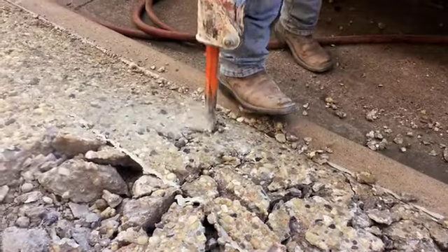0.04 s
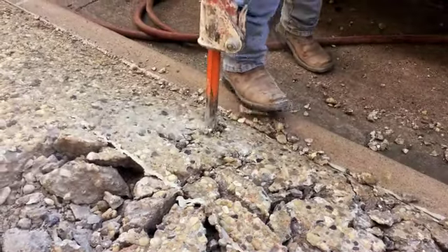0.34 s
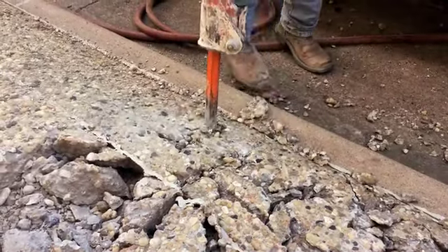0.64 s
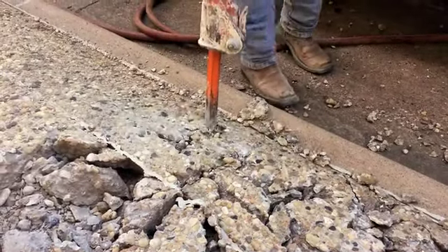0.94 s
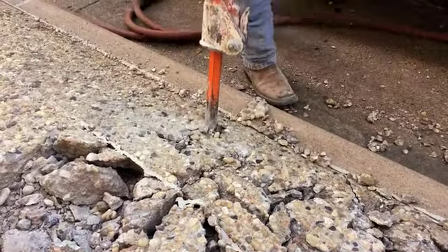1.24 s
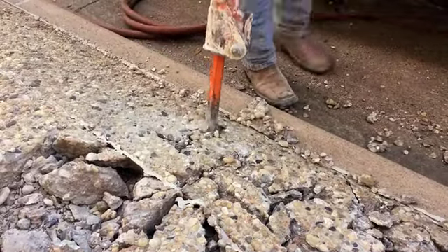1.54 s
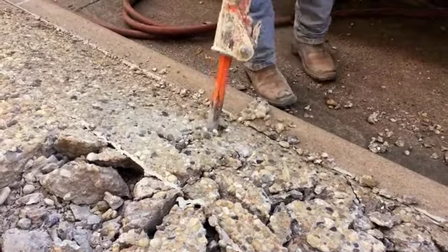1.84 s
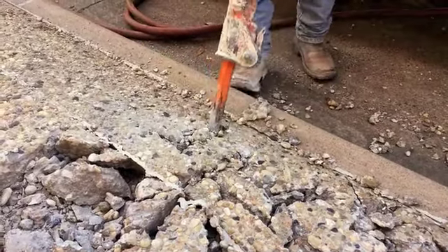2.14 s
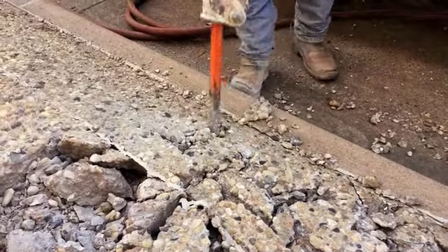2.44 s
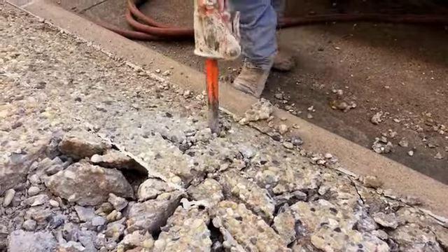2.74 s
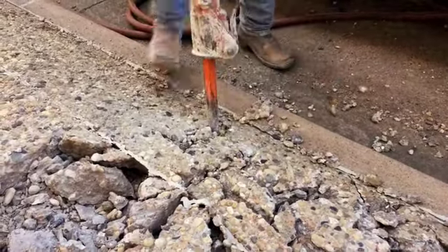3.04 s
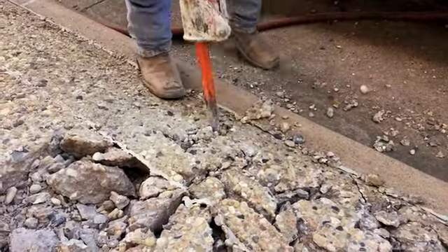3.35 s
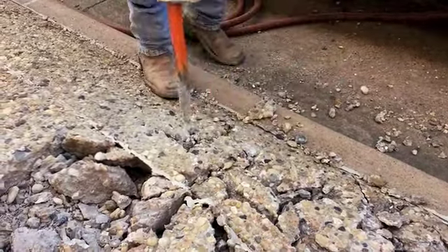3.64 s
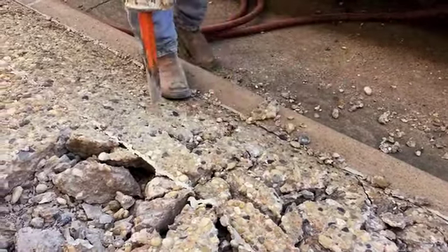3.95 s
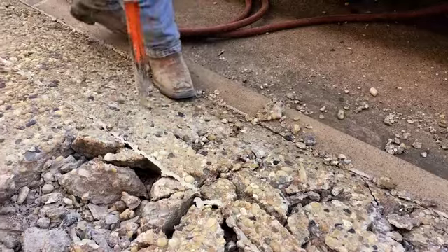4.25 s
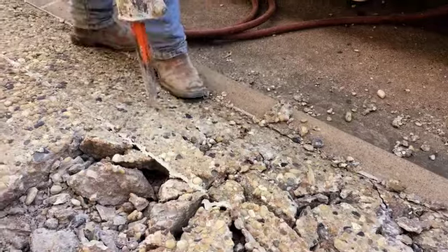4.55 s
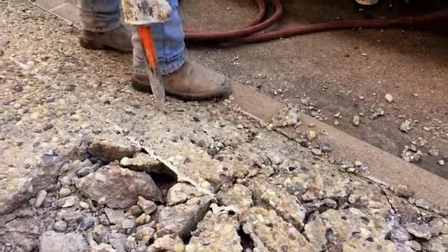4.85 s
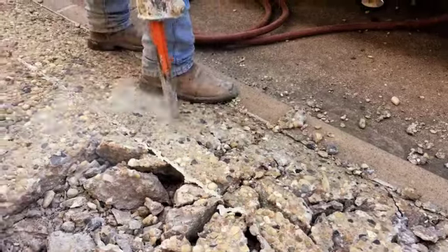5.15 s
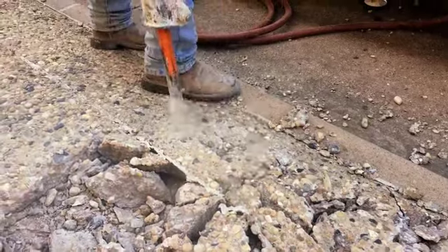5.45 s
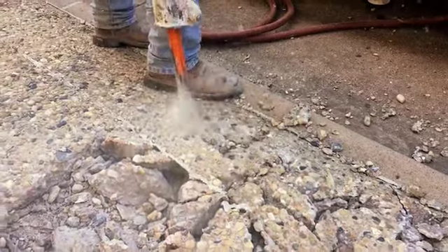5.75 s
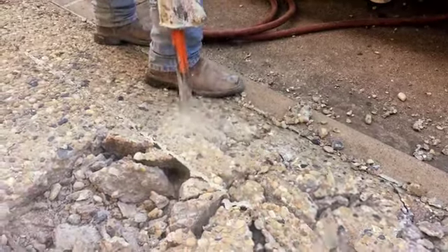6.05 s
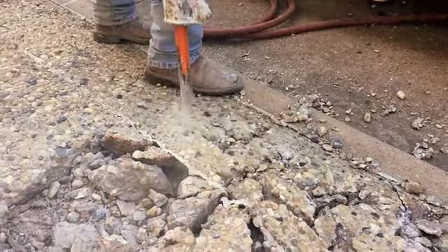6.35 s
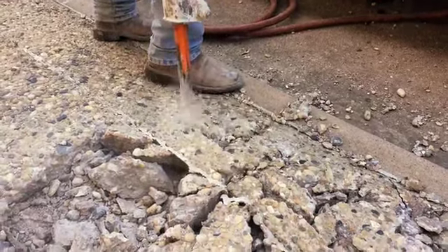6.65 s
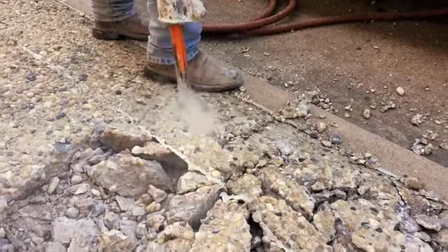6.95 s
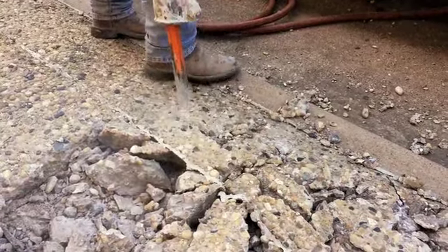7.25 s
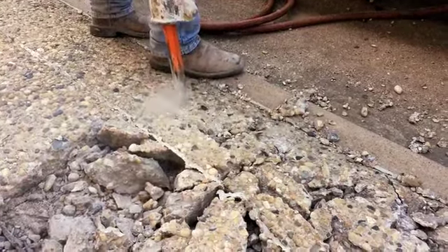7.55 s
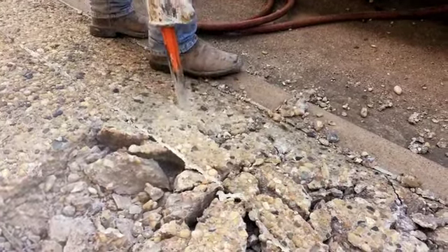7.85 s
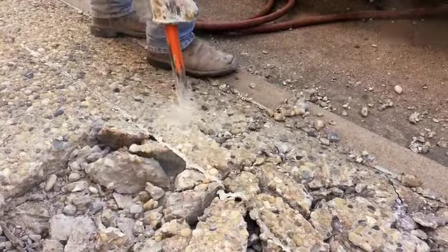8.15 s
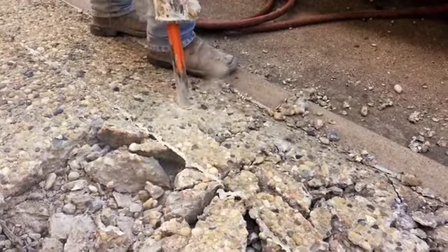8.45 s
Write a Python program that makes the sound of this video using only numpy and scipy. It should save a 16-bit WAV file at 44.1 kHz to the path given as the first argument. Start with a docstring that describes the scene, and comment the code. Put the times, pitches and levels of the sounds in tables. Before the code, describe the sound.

A jackhammer rattles on concrete, pauses while its chisel clinks and scrapes over a humming compressor, then resumes hammering loudly.

```python
"""Jackhammer on concrete

A pneumatic piston's blows and return strokes excite the modes of housing, chisel and slab, and each
vents a puff of air. In a pause the compressor engine sinks to idle, pebbles snap underfoot, and the
chisel clinks, is dragged to a new spot and thuds down on the slab; then the hammering resumes. Air
buffets the microphone. A gain control ducks at loud sounds and lets the compressor swell in the pause."""
import sys
import numpy as np
from scipy import signal
from scipy.fft import rfft, irfft
from scipy.io import wavfile
from scipy.ndimage import uniform_filter1d

SR = 44100
rng = np.random.default_rng(int(sys.argv[2]) if len(sys.argv) > 2 else 0)


def wav_out(sig):
    """Save sig, one row per channel (or a flat mono array), as 16-bit PCM at SR to the path in sys.argv[1]."""
    wavfile.write(sys.argv[1], SR, np.round(np.clip(np.atleast_2d(sig).T, -1, 1) * 32767).astype(np.int16))


N = 384111
T = np.arange(N) / SR

# the piston's pace, one list per burst: time_s, blows_so_far
BURSTS = [
    [(-.033, 0), (.404, 9)],
    [(3.546, 0), (3.892, 7), (4.403, 17), (4.757, 24), (4.913, 27), (5.527, 39), (5.772, 44), (6.269, 54),
     (6.81, 65), (7.732, 84), (8.741, 105)],
]
# how the tool sits as it digs in: time_s, chisel_looseness (0-1), port_pitch_hz
SEATING = [(0, 0.12, 1570), (.45, 0.14, 1700), (3.5, 0.79, 1980), (4.2, 0.96, 1980), (5.498, 0.83, 2022),
           (6.349, 0.57, 2053), (6.797, 0.26, 2028), (7.3, 0.1, 2074), (7.8, 0.09, 2037), (8.7, 0.12, 2150)]
# the chisel's modes: pitch_hz, width_hz, struck_end_on_db, knocked_sideways_db
CHISEL_MODES = [(1585, 20, -5.5, -3), (2760, 150, -26, 1.5), (3090, 33, 5, 13.5), (3560, 90, -13, 5),
                (4810, 84, -29, -4), (5190, 23, -4, -10), (6810, 38, -11.5, -7), (9200, 28, -16.5, -13.5),
                (11500, 37, -25, -34), (13160, 70, -35, -35), (14200, 60, -35, -33),
                (15400, 27, -21.5, -42)]


def jackhammer():
    """Impact excitation: each stroke drives several resonators; a loose chisel rings far more."""
    blows, returns = strokes()
    loose = along(SEATING)[0]
    body = housing(blows, returns) + amp(-9.5) * port(blows, returns)
    body += amp(-7.5) * muffler(blows, returns)
    steel = amp(-3 - 2.5 * loose) * clash(blows, returns)
    crushed = amp(-17.5) * grit(blows, returns)
    body += slab_boom(blows, returns)
    steel += blow_clangs(blows, returns)
    steel += amp(-19 + 18.5 * loose) * free_ring(blows, returns)
    return amp(5.5 - 0.5 * loose) * body + steel + crushed


def strokes(return_s=0.019):
    """Reciprocation: times of blows and return strokes, the returns later when the chisel is loose."""
    blows = np.concatenate([np.interp(np.arange(b[-1][1]), *np.transpose(b)[::-1]) for b in BURSTS])
    loose = along(SEATING, blows)[0]
    blows += 0.00017 * loose * rng.standard_normal(len(blows))
    lag_s = loose * (0.0033 + 0.0008 * rng.standard_normal(len(blows)))
    return blows, blows + return_s + lag_s


def impacts(blows, returns, return_db, alike, contact_s, tail_db, tail_s, scatter_db, rattle_db):
    """Quasi-periodic forcing: part of each impact repeats every cycle, drifting as the chisel digs in."""
    out = np.zeros(N)
    for times, db in ((blows, 0), (returns, return_db)):
        patterns = [chatter(contact_s, tail_db, tail_s) for _ in range(14)]
        for s, loose in zip(times, along(SEATING, times)[0]):
            k, blend = divmod(np.clip(s / T[-1], 0, 1) * (len(patterns) - 2), 0.94)
            angle = blend * np.pi / 2
            repeated = np.cos(angle) * patterns[int(k)] + np.sin(angle) * patterns[int(k) + 1]
            share = alike * (1 - 0.25 * loose)
            gain = amp(db + scatter_db * np.clip(rng.standard_normal(), -2, 2))
            fresh = chatter(contact_s, tail_db, tail_s)
            add(out, s, gain * (np.sqrt(share) * repeated + np.sqrt(1 - share) * fresh))
            # a loose chisel rattles in its collar just ahead of the stroke
            early_s = s - rng.uniform(0.001, 0.005)
            add(out, early_s, gain * loose * amp(rattle_db) * chatter(contact_s, tail_db, tail_s))
    return out


def housing(blows, returns):
    """Forced vibration: the housing's resonances filter the piston's knocks."""
    # the housing's response: frequency_hz, gain_db
    response = [(120, -10.5), (200, -13.5), (244, -11.5), (287, -3), (405, -10), (455, -2), (560, -5.5),
                (830, -8.5), (1130, -11), (1360, -8.5), (1880, -11.5), (2060, -3), (2700, -9.5),
                (3290, -0.5), (4470, -18.5), (5360, -18.5), (15000, -49)]
    knocks = impacts(blows, returns, return_db=-2, alike=0.82, contact_s=0.009,
                     tail_db=-10.3, tail_s=0.026, scatter_db=0.8, rattle_db=0)
    return unit(colour(knocks, response))


def port(blows, returns):
    """Air resonance: vented bursts excite the exhaust port's modes, which shift together."""
    # the port's modes: pitch_ratio, width_hz, level_db
    modes = [(.48, 54.3, -4), (.69, 70, -9), (1, 57, 2), (1.1, 45.7, -4)]
    port_hz = along(SEATING)[1]
    air = impacts(blows, returns, return_db=-1, alike=0.9, contact_s=0.007,
                  tail_db=-16, tail_s=0.015, scatter_db=0.8, rattle_db=-6)
    return unit(sum((-1) ** k * amp(db) * resonate(air, port_hz * ratio, width)
                    for k, (ratio, width, db) in enumerate(modes)))


def muffler(blows, returns, delay_s=0.00376):
    """Cavity resonance: each stroke vents one sharp puff through the muffler."""
    # the muffler's resonances: pitch_hz, width_hz, level_db
    modes = [(86, 17, 1.5), (105, 93, -2), (127, 59, -15), (188, 23.2, 6.5), (281, 26, -6.5),
             (454, 64, 3.5)]
    puffs = np.zeros(N)
    for times, db in ((blows, 0), (returns, -3)):
        for s in times:
            vent_s = s + delay_s + 0.00035 * rng.standard_normal()
            add(puffs, vent_s, amp(db + 1.54 * rng.standard_normal(1)))
    return unit(colour(ring(puffs, modes), [(20, -11), (55, -8.5), (78, 4.5), (700, -2), (2000, -27)]))


def clash(blows, returns):
    """Hard contact: steel meets steel, radiating a band of noise around the chisel's main mode."""
    strikes = impacts(blows, returns, return_db=-2.5, alike=0.28, contact_s=0.008,
                      tail_db=-12, tail_s=0.01, scatter_db=2, rattle_db=-6)
    band = [(1500, -36.5), (2700, -14.5), (3100, 1.5), (3450, -5), (3800, -8), (4500, -23), (8000, -43)]
    return unit(colour(strikes, band))


def blow_clangs(blows, returns, pitch_hz=3340, level_db=8, contact_s=0.0074):
    """Driven mode: each stroke sounds the chisel's main mode, the return more weakly and roughly."""
    # blows that clang out above the rest: time_s, pitch_hz, level_db
    hard_blows = [(3.595, 3186, 14), (4.148, 3280, 17.5), (4.301, 3290, 12.5), (4.403, 3100, 10.5),
                  (5.374, 3050, 10.5), (5.921, 3330, 12), (6.12, 3350, 13.5), (6.613, 3310, 14),
                  (6.859, 3330, 8), (7.053, 3340, 12), (7.101, 3370, 6), (7.392, 3260, 10.5),
                  (7.78, 3330, 10), (7.924, 3370, 12), (7.972, 3396, 13)]
    accents = {np.argmin(abs(blows - s)): (hz, db) for s, hz, db in hard_blows}
    out = np.zeros(N)
    for k, loose in enumerate(along(SEATING, blows)[0]):
        detune, force = np.clip(rng.standard_normal(2), -2, 2)
        hz, db = accents.get(k, (pitch_hz * (1 + 0.011 * detune), level_db + 0.5 * force))
        add(out, blows[k], amp(db) * squeal(hz, contact_s + 0.0076 * loose, rough=0.69))
        return_hz = pitch_hz * rng.uniform(0.93, 1.04)
        add(out, returns[k], amp(level_db - 4) * squeal(return_hz, contact_s, rough=1.09))
    return out


def free_ring(blows, returns, scatter_db=5, detune=0.0091):
    """Free vibration: each stroke shares its energy anew among the chisel's modes and detunes them."""
    out, t = np.zeros(N), np.arange(4400) / SR
    for hz, width, db, _ in CHISEL_MODES:
        envelope = amp(db) * width * (1 - np.exp(-t / 0.0012)) * np.exp(-np.pi * width * t)
        for times, stroke_db in ((blows, 0), (returns, -4)):
            for s, (share, shift) in zip(times, np.clip(rng.standard_normal((len(times), 2)), -2, 1.5)):
                tone = np.sin(2 * np.pi * hz * (1 + detune * shift) * t)
                add(out, s + 0.002022, amp(stroke_db + scatter_db * share) * envelope * tone)
    return unit(out)


def slab_boom(blows, returns):
    """Plate resonance: the slab booms at each blow, its pitch less even when the chisel is loose."""
    # the boom shifts as cracks open under the tip: time_s, pitch_hz, level_db
    resonance = [(.2, 650, -11.5), (3.55, 790, -15), (5.5, 784, -15.5), (5.9, 544, -12), (6.1, 560, -3),
                 (6.24, 770, -9), (6.6, 624, -7), (6.93, 656, -5), (7.13, 525, -12), (7.75, 515, -14.5),
                 (8.4, 635, -19), (8.52, 520, -21)]
    push = impacts(blows, returns, return_db=-5, alike=0.92, contact_s=0.007,
                   tail_db=-20, tail_s=0.01, scatter_db=1, rattle_db=-9)
    hz, db = along(resonance, blows)
    hz *= np.exp(0.097 * along(SEATING, blows)[0] * rng.standard_normal(len(blows)))
    return amp(np.interp(T, blows, db)) * unit(resonate(push, np.interp(T, blows, hz), width_hz=125))


def grit(blows, returns):
    """Brittle fracture: stone crushed at each stroke gives a flickering hiss."""
    # spectrum of crushing stone: frequency_hz, gain_db
    spectrum = [(1500, -36), (4000, -6), (6000, 20), (9500, 19), (12000, 11.5), (16000, -60)]
    crush = impacts(blows, returns, return_db=-3.5, alike=0, contact_s=0.004,
                    tail_db=0, tail_s=0.012, scatter_db=4, rattle_db=-3)
    return unit(colour(crush * wander(depth_db=4.5, per_s=900, size=8192), spectrum))


def chips(per_s=200, decay_s=0.00048):
    """Shot noise: fragments snap off at random while the hammer runs."""
    running = sum((T > burst[0][0]) & (T < burst[-1][0]) for burst in BURSTS)
    snaps = amp(1.5 * np.minimum(rng.exponential(1, N), 3)) * (rng.random(N) < per_s / SR)
    envelope = signal.lfilter([1], [1, -np.exp(-1 / (decay_s * SR))], snaps * running)
    spectrum = [(200, -2), (750, -2), (1500, 7.5), (3400, 3), (6000, -11), (15000, -39)]
    return amp(-6) * unit(colour(envelope * rng.standard_normal(N), spectrum))


def chisel_knocks():
    """Impact on stone: each contact sets the pitch of its clang and excites the chisel, the stone and the shank
    seated in the tool."""
    # the tip's contacts: start_s, clang_db, pitch_hz, ring_db, crack_db, hollow_db, contact_s
    contacts = [(0.405, 0, 3110, -4, -11, 1, 0.014), (0.465, -27, 3230, -26, -19, -39, 0.028),
                (0.492, -24, 3230, -26, -21, -16.5, 0.019), (0.639, -12.5, 2610, -40, -36, -50, 0.0051),
                (0.8455, -15, 3210, -28, -29, -13, 0.0046), (.869, -31, 2970, -34, -28, -25, 0.0037),
                (.924, -6, 3004, -8, -20.5, -33, 0.0091), (1.169, -3.5, 3140, -16, -21, -12.5, 0.0036),
                (1.205, -12, 3080, -13, -11.5, -37, 0.0095), (1.215, -29, 3640, -42, -12.5, -33, 0.0077),
                (1.821, -22, 3320, -21, -21.5, -15.5, 0.0071), (1.846, -37, 3250, -45, -27, -39, .005),
                (1.92, -18.5, 3156, -32, -38, -27.5, 0.02), (2.237, 8, 3070, 1, -14, -19, 0.0072),
                (2.257, -1.5, 3385, -22, -17.5, -24, 0.015), (2.357, -27, 3240, -33, -38, -42, 0.026),
                (2.544, -11, 3400, -27, -28, -24, 0.0034), (2.574, 1, 3590, -4.5, -15.5, -25, 0.0018),
                (2.71, -5, 3440, -13, -32, -18.5, 0.0033), (2.717, -3.5, 3090, -19, -19, -22, 0.0024),
                (2.784, -34, 3140, -24, -33, -23, 0.01), (2.818, -8.5, 3685, -10.5, -14, -20, 0.011),
                (2.852, -6.5, 3040, -18, -16, -23, 0.0024), (3.497, -11, 3100, -51, -27, -25, 0.0078),
                (3.517, -17, 3230, -16, -4, -7, 0.019), (3.546, -4, 3460, -12, 0, -4, 0.016),
                (4.811, -7, 3220, 7, 1, -3, 0.015), (5.631, 18, 3220, 7, 4, -7, 0.012),
                (6.372, 14, 3220, -9, 7, -5, 0.0065), (6.963, 10, 3380, -6, 6, 6, 0.0077),
                (7.202, 11, 3250, -6, 11.5, 2, 0.0035), (8.455, 19, 3230, -6, -1, -12, .004),
                (8.505, 14, 3120, 5, -14, -10, 0.0054), (8.553, 11, 3150, -4, -3, -6, 0.0092)]
    # hollow modes of the chisel's shank knocking in the tool: pitch_hz, width_hz, level_db
    hollow_modes = [(780, 69, 1), (1900, 75, 6.5), (3380, 150, 6), (5230, 42, -5.5)]
    clangs, steel, stone, shank = np.zeros((4, N))
    for s, clang_db, hz, ring_db, crack_db, hollow_db, contact_s in contacts:
        hit = chatter(contact_s, tail_db=-18, tail_s=0.018) * np.sqrt(contact_s * SR)
        add(clangs, s, amp(clang_db) * squeal(hz, contact_s, rough=0.65))
        add(steel, s, amp(ring_db) * hit)
        add(stone, s, amp(crack_db) * hit)
        add(shank, s, amp(hollow_db) * hit)
    return clangs + tip_on_stone(steel, stone) + ring(shank, hollow_modes)


def chisel_bounces():
    """Release of damping: the chisel bounces free and one mode sings until it is seated again."""
    # moments of free flight: start_s, length_s, pitch_hz, level_db
    bounces = [(3.6, 0.033, 5210, 5), (3.698, 0.0053, 5220, 13.5), (4.008, 0.01, 3130, 14),
               (4.05, 0.01, 3120, 14.5), (4.158, 0.011, 3130, 5), (4.408, 0.022, 5260, 0),
               (4.807, .033, 4900, -1), (4.855, 0.019, 4880, 2), (5.015, .02, 4900, 0),
               (5.128, 0.035, 3085, 14.5), (5.236, 0.034, 5300, 0), (5.322, 0.057, 5220, 0.5),
               (5.428, 0.018, 4870, 5), (5.584, 0.012, 3150, 15), (5.577, .016, 5180, 4),
               (5.92, 0.066, 5200, -2), (6.231, 0.034, 5140, -3), (6.278, 0.025, 5205, -1),
               (6.325, 0.025, 5130, 0)]
    out = np.zeros(N)
    for s, length, hz, db in bounces:
        add(out, s, amp(db) * squeal(hz, length, rough=0.38))
    return out


def chisel_drags(slips_per_s=3200, fade_s=0.0072):
    """Stick-slip friction: the dragged tip grips and lets go, squealing and crunching sand."""
    # drags over the slab: start_s, length_s, level_db, pitch_hz, roughness (0-1)
    drags = [(2.487, 0.044, -20, 3100, 0.1), (2.512, 0.076, -13.5, 3090, 0.88),
             (2.594, 0.012, -35, 3150, 0.9), (2.615, 0.066, -5, 3060, 0.3),
             (2.669, 0.037, -11.5, 3116, 0.9)]
    squeals, steel, stone = np.zeros((3, N))
    t = np.arange(SR // 5) / SR
    for s, length, db, hz, rough in drags:
        judder = wander(depth_db=1.5 * rough, per_s=180)[:len(t)]
        pressure = amp(db) * np.clip(np.minimum(t, length - t) / fade_s, 0, 1) * judder
        slips = unit(rng.standard_normal(len(t)) * (rng.random(len(t)) < slips_per_s / SR))
        add(steel, s, pressure * amp(-14.5) * slips)
        add(stone, s, pressure * amp(-26.5) * slips)
        add(squeals, s, pressure * squeal(hz, length, rough, size=len(t)))
    return squeals + tip_on_stone(steel, stone)


def tip_on_stone(steel_force, stone_force, damping_hz=30):
    """Contact damping: resting on stone widens the chisel's modes; the stone answers broadly."""
    # the stone's response: frequency_hz, gain_db
    response = [(150, -7.5), (620, -3.5), (1250, 1), (1550, -7.5), (2100, 3.5), (2600, 0), (3400, 3),
                (4500, 0), (7000, -12), (10000, -21), (16000, -28)]
    modes = [(hz, width + damping_hz, db) for hz, width, _, db in CHISEL_MODES]
    return ring(steel_force, modes, swell=1) + colour(stone_force, response)


def compressor(idle_hz=40.6, loaded_hz=82.5, sink_s=0.46, run_up_s=0.9):
    """Periodic firing: the engine hums and clatters, faster under load, while its casing whines."""
    # the exhaust pipe's response: frequency_hz, gain_db
    pipe = [(25, -38), (42, -42), (60, 1), (80, -3), (118, 0), (160, -12.5), (240, -18), (450, -39)]
    # spectrum of the engine's clatter: frequency_hz, gain_db
    clatter_spectrum = [(25, -33), (60, 16.5), (130, 12.5), (250, 7.5), (400, 3), (560, 2.5), (645, 1),
                        (800, -3), (1100, -3.5), (1340, 2), (1550, -0.5), (2200, 4), (2750, 0.5), (3350, 6),
                        (4300, -18), (6500, -24.5), (9000, -62), (16000, -54)]
    # casing whines that come and go: pitch_hz, width_hz, level_db, peak_s, half_length_s
    whines = [(645.7, 12, -42.5, 1.44, 1), (1310, 21, -35, 3.9, 0.65), (1840, 22, -47.5, 1.7, 0.92),
              (2320, 20, -40.5, 1.83, 0.46)]
    stop, restart = BURSTS[0][-1][0], BURSTS[1][0][0]
    load = np.exp(-(np.maximum(T - stop, 0) / sink_s) ** 2) + np.clip((T - restart) / run_up_s, 0, 1)
    firing_hz = idle_hz + (loaded_hz - idle_hz) * load
    phase = 2 * np.pi * np.cumsum(firing_hz) / SR
    hum = sum(gain_at(pipe, k * firing_hz) * np.cos(k * phase + 2 * np.pi * rng.random())
              for k in range(1, 7))
    clatter = unit(colour(rng.standard_normal(N) * (1 + 0.23 * np.cos(phase)), clatter_spectrum))
    whine = sum(amp(db) * bell_curve(s, half) * unit(resonate(rng.standard_normal(N), hz, width))
                for hz, width, db, s, half in whines)
    hum *= wander(depth_db=-1, per_s=18)
    return amp(-32.5 + 21 * load) * hum + amp(-31.5 + 8.5 * load) * clatter + whine


def low_thumps():
    """Pressure transients: the chisel thuds down on the slab, then air buffets the microphone."""
    # low rumbles, the first from the chisel, the rest from air: peak_s, level_db, half_length_s
    rumbles = [(2.83, -26, 0.094), (3.34, -30.5, 0.092), (3.64, 1, 0.067), (4.323, -21, 0.076)]
    # low thumps sinking in pitch, the first from the chisel: start_s, peak_db, final_pitch_hz, rise_s
    thumps = [(2.821, -4.5, 174, 0.005), (3.209, -19, 69.6, 0.01), (3.328, -16, 81.5, 0.011),
              (3.387, -19, 87, 0.012), (3.447, -18.5, 69.4, 0.0086), (3.526, -1, 90, 0.0037),
              (3.545, 1, 218, .005), (3.563, 4, 110, 0.0061), (3.591, 14, 248, 0.0052),
              (3.599, 8, 80, 0.0064), (3.642, 22.5, 55.5, 0.012), (3.747, 17.5, 52.7, 0.0056),
              (3.797, 11.5, 60.4, 0.0073), (4.296, 6, 55.3, 0.013)]
    strength = sum(amp(db) * bell_curve(s, half) for s, db, half in rumbles)
    spectrum = [(20, -19), (55, 10.5), (100, 3), (330, -4.5), (600, -24), (3000, -61)]
    out = strength * colour(rng.standard_normal(N), spectrum)
    t = np.arange(SR // 6) / SR
    for s, db, hz, rise_s in thumps:
        cycles = np.cumsum(hz + 330 * np.exp(-t / 0.0062)) / SR
        envelope = (t / rise_s) ** 2 * np.exp(2 - 2 * t / rise_s)
        add(out, s, amp(db) * envelope * np.sin(2 * np.pi * cycles))
    return out


def pebbles(contact_s=0.0021):
    """Heavily damped resonance: pebbles snap dryly under the boots."""
    # snaps underfoot: start_s, level_db, pitch_hz
    snaps = [(1.273, -29, 3370), (1.729, -26, 950), (2.016, -38, 4300), (2.12, -39, 4500),
             (3.041, -43, 4600), (3.307, -32, 4440)]
    out = np.zeros(N)
    for s, db, hz in snaps:
        hit = chatter(contact_s, tail_db=0, tail_s=0.0088) * np.sqrt(contact_s * SR)
        add(out, s, amp(db) * ring(hit, [(hz, 0.11 * hz, 0)]))
    return out


def street_echoes(x, t60_s=0.095, per_s=2000):
    """Reflection: kerb, truck and walls return sparse, quickly fading echoes."""
    t = np.arange(SR // 2) / SR
    taps = rng.standard_normal(len(t)) * (rng.random(len(t)) < per_s / SR)
    taps *= (t > 0.012) * amp(-60 * t / t60_s)
    taps = colour(taps / np.linalg.norm(taps), [(100, -6.5), (3500, 1.5), (6000, 1.5), (16000, -1)])
    return signal.oaconvolve(x, taps)[:N]


def chatter(contact_s, tail_db, tail_s, size=2600):
    """Contact noise: one broadband impact of unit energy chatters, then dies away."""
    t = np.arange(size) / SR
    envelope = np.exp(-(t / contact_s) ** 4) + amp(tail_db) * np.exp(-t / tail_s)
    burst = envelope * rng.standard_normal(size)
    for _ in range(3):  # flatten the spectrum while keeping the burst short
        burst = irfft(np.exp(1j * np.angle(rfft(burst))), size) * np.minimum(3 * envelope, 1)
    return burst / np.linalg.norm(burst)


def squeal(hz, contact_s, rough, decay_s=0.0032, size=4400):
    """Random modulation: grinding roughens one chisel mode, held for the contact time, then damped."""
    t = np.arange(size) / SR
    grip, slip = unit(uniform_filter1d(uniform_filter1d(rng.standard_normal((2, size)), 60), 40))
    envelope = (1 - np.exp(-t / 0.00023)) * np.exp(-np.maximum(t - contact_s, 0) / decay_s)
    phase = 2 * np.pi * np.cumsum(hz * (1 + 0.035 * rough * slip)) / SR
    return envelope * (1 + 0.32 * rough * grip) * np.sin(phase)


def ring(x, modes, swell=0):
    """Modal superposition: filters x by decaying modes of unit total energy; swell=1 softens onsets."""
    t = np.arange(8192) / SR
    taps = sum(amp(db) * width * (width * t) ** swell * np.exp(-np.pi * width * t)
               * np.sin(2 * np.pi * hz * t) for hz, width, db in modes)
    return signal.oaconvolve(x, taps / np.linalg.norm(taps))[:len(x)]


def resonate(x, hz, width_hz):
    """A single resonance whose centre follows hz."""
    carrier = np.exp(2j * np.pi * np.cumsum(hz * np.ones(N)) / SR)
    pole = np.exp(-np.pi * width_hz / SR)
    return 2 * (carrier * signal.lfilter([1 - pole], [1, -pole], x / carrier + 1e-18)).real


def colour(x, spectrum):
    """Minimum-phase filter of unit energy, shaped by (frequency_hz, gain_db) points."""
    log_gain = np.log(gain_at(spectrum, abs(np.fft.fftfreq(4096, 1 / SR))))
    taps = np.fft.ifft(np.exp(np.conj(signal.hilbert(log_gain)))).real
    return signal.oaconvolve(x, taps / np.linalg.norm(taps))[:len(x)]


def gain_at(spectrum, hz):
    """Gain of a spectrum table, interpolated in log frequency."""
    points_hz, db = np.transpose(spectrum)
    return amp(np.interp(np.log(hz + 1), np.log(points_hz), db))


def along(rows, t=T):
    """Each column of a curve table at the times t."""
    s, *columns = np.transpose(rows)
    return [np.interp(t, s, c) for c in columns]


def wander(depth_db, per_s, size=256):
    """A gain that drifts at random."""
    return amp(depth_db * np.interp(T * per_s, np.arange(size), rng.standard_normal(size), period=size))


def bell_curve(peak_s, half_length_s):
    """A Gaussian swell and fade."""
    return np.exp(-((T - peak_s) / half_length_s) ** 2)


def add(mix, s, sound):
    """Superposes a sound at time s."""
    start = round(s * SR)
    part, sound = mix[max(start, 0):], sound[max(-start, 0):]
    part[:len(sound)] += sound[:len(part)]


def amp(db):
    """Decibels to amplitude."""
    return 10 ** (np.asarray(db) / 20)


def unit(x):
    """Scales to unit RMS."""
    return x / np.sqrt(np.mean(x ** 2) + 1e-20)


def gain_control(x, threshold_db=-12.5, attack_s=0.017, recover_db_per_s=20, hop=64):
    """Dynamic compression: the gain falls quickly while the sound is too loud, then creeps back."""
    level_db = 10 * np.log10(abs(uniform_filter1d(x ** 2, 2 * hop)[::hop]) + 1e-12)
    step_s, duck_db = hop / SR, [0]
    for over_db in level_db - threshold_db:
        fall_db = max(over_db - duck_db[-1], 0) * step_s / attack_s
        duck_db.append(max(duck_db[-1] + fall_db - recover_db_per_s * step_s, 0))
    duck_db = np.array(duck_db[1:])
    duck_db[:2 * hop] = duck_db[2 * hop]  # already settled: the hammer is running at the start
    return amp(-np.interp(T, T[::hop], duck_db))


def scene():
    """Superposition: the tool and its echoes over compressor, pebbles and low thumps."""
    tool = jackhammer() + chips() + chisel_knocks() + chisel_bounces() + chisel_drags()
    return (tool + amp(-11.5) * street_echoes(tool) + compressor() + pebbles() + low_thumps())[None]


def record(dry, ceiling=0.54, bass_cut_hz=25, band_edge_hz=16000):
    """Transduction: the microphone's bass roll-off, gain control, soft saturation and a band limit."""
    caught = signal.lfilter(*signal.butter(1, bass_cut_hz, "high", fs=SR), dry)
    held = caught * gain_control(caught[0])
    rounded = held / (1 + (held / ceiling) ** 4) ** (1 / 4)
    low_pass = signal.firwin(255, band_edge_hz, window=("kaiser", 9), fs=SR)
    return signal.oaconvolve(rounded, low_pass[None], "same")


dry = scene()
out = record(dry)
wav_out(out)
```